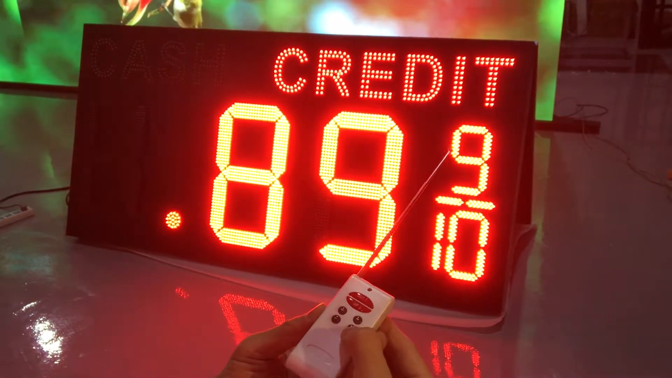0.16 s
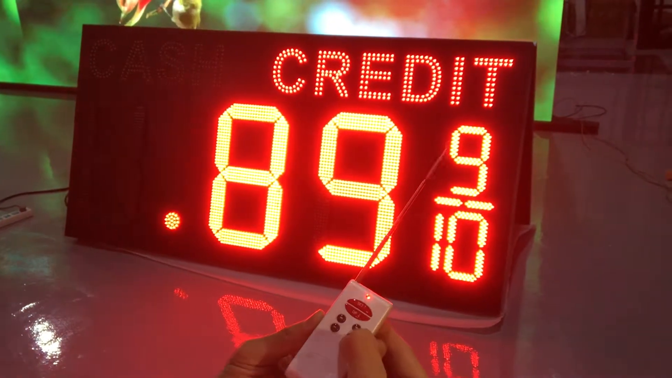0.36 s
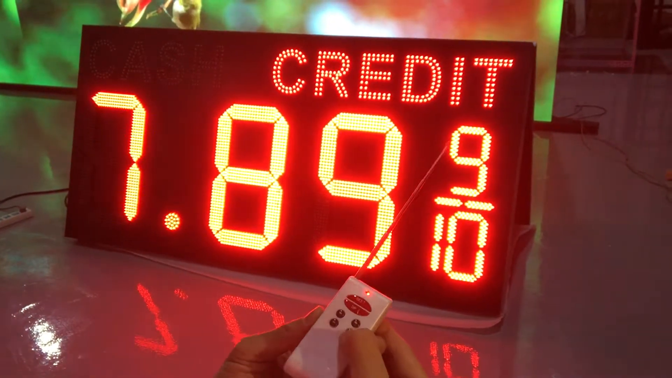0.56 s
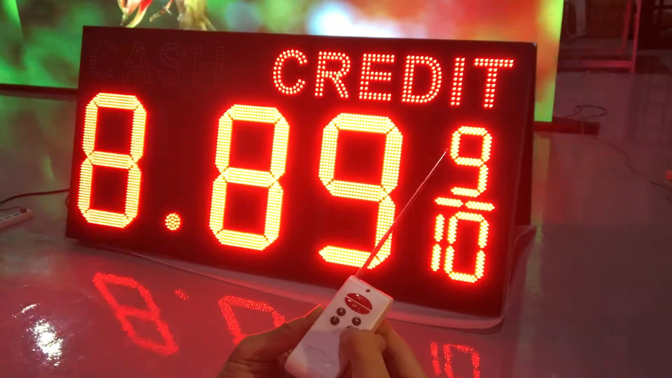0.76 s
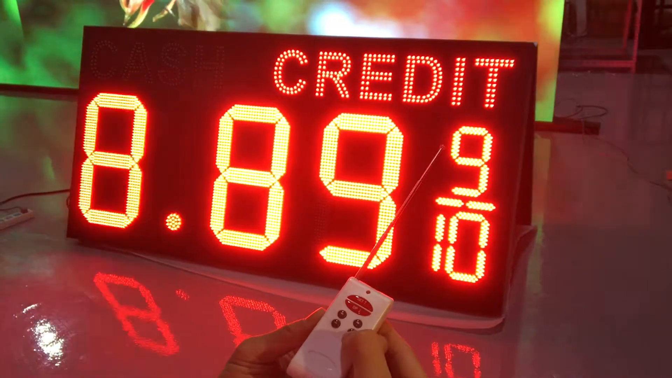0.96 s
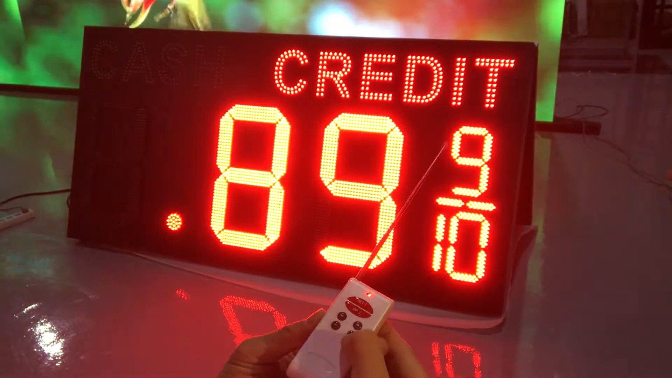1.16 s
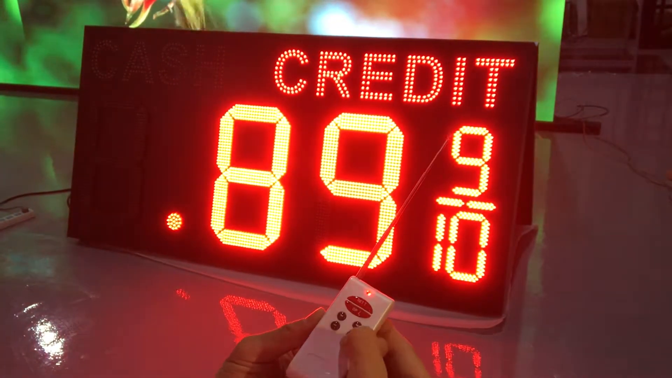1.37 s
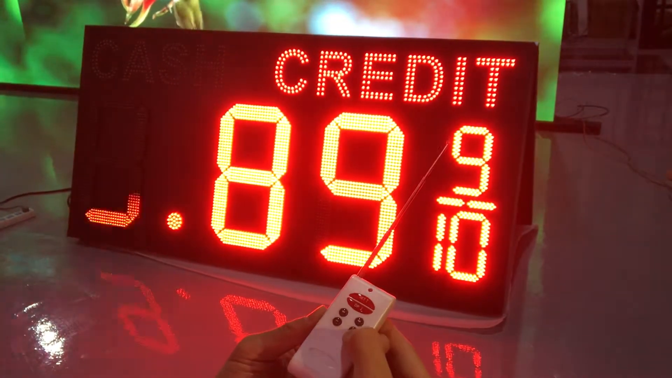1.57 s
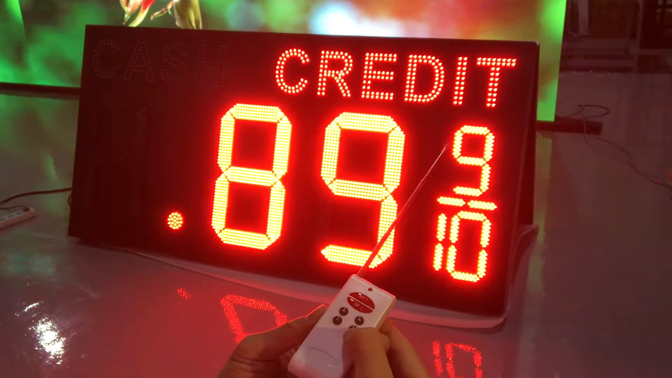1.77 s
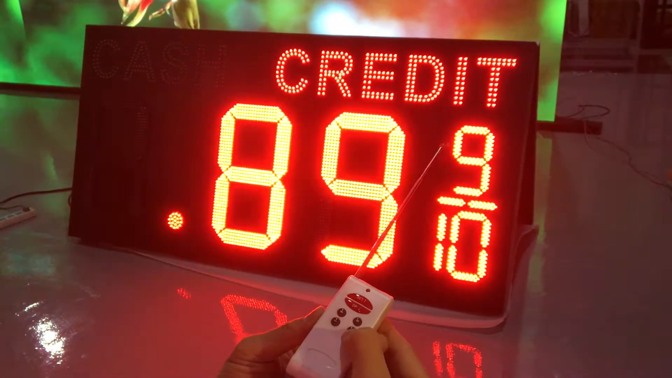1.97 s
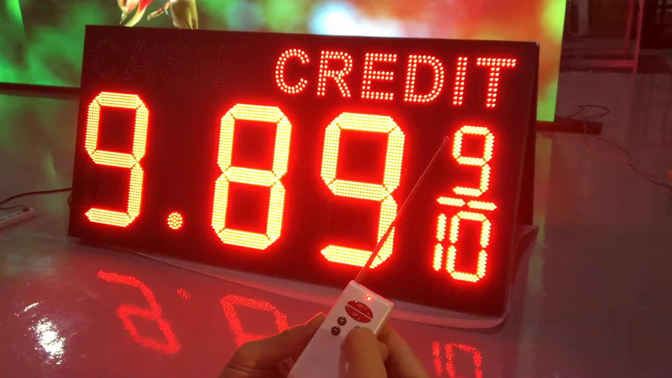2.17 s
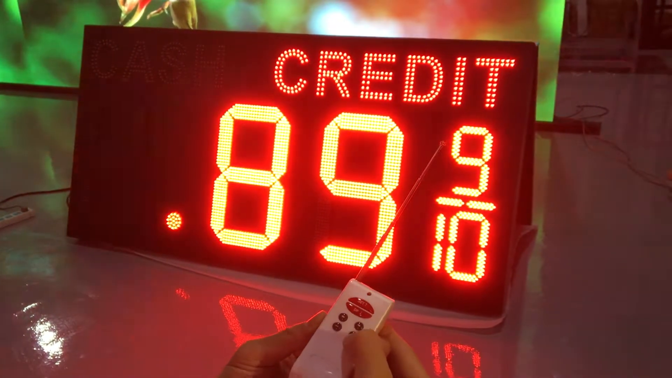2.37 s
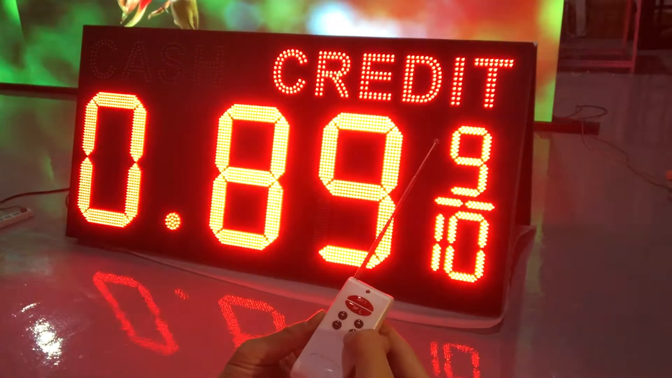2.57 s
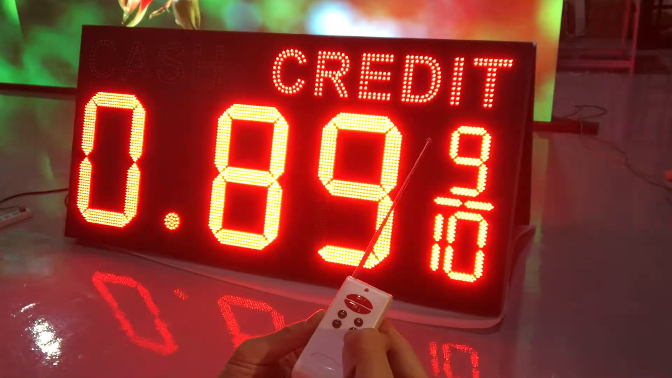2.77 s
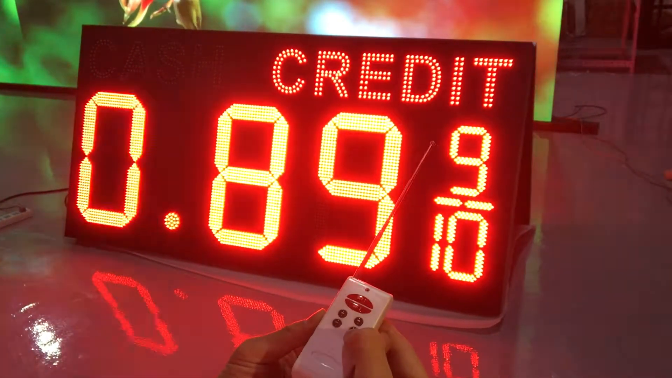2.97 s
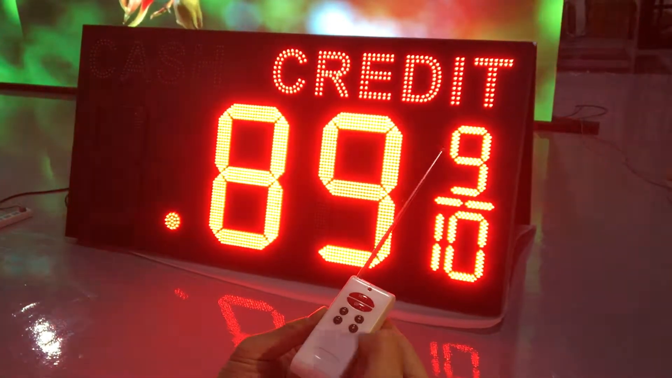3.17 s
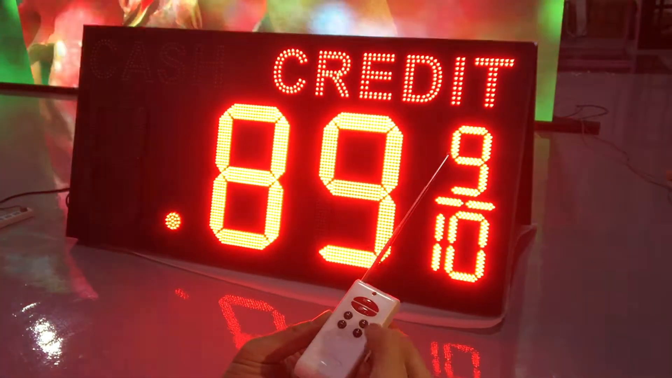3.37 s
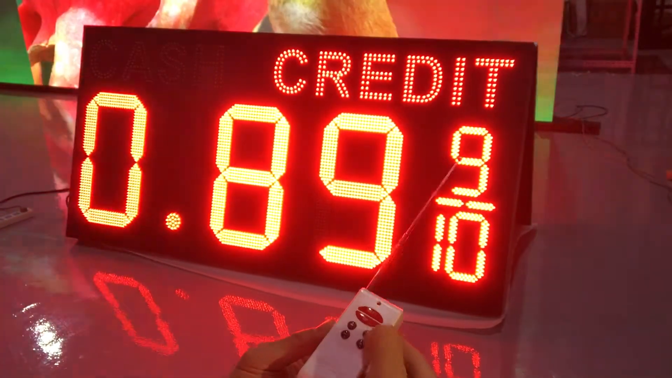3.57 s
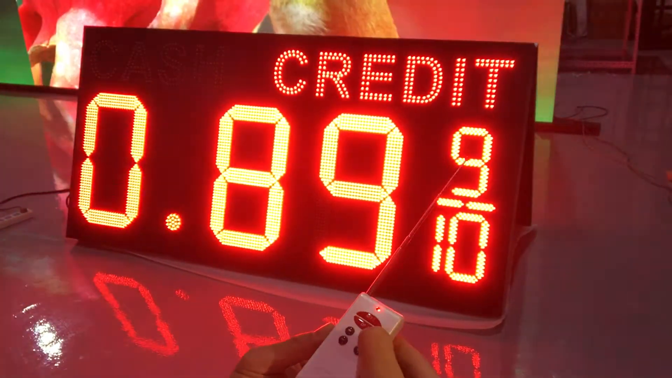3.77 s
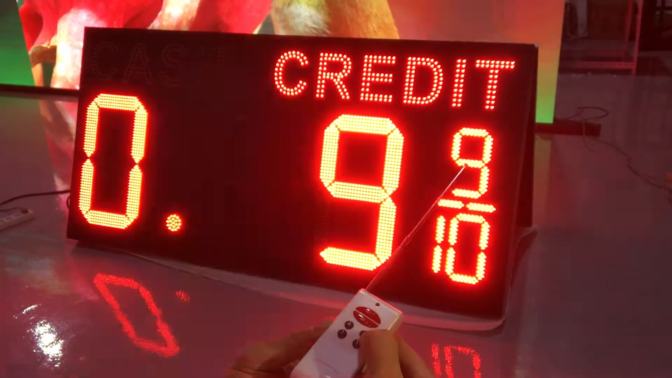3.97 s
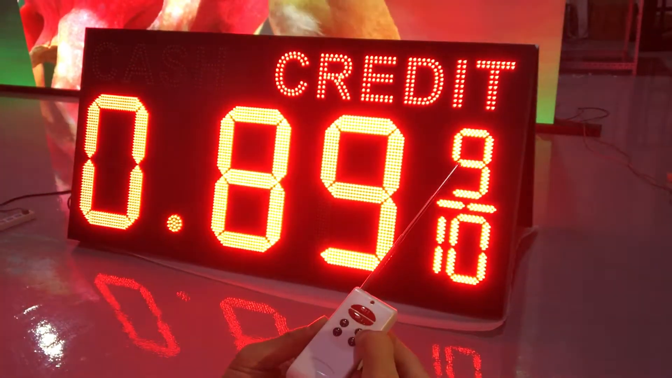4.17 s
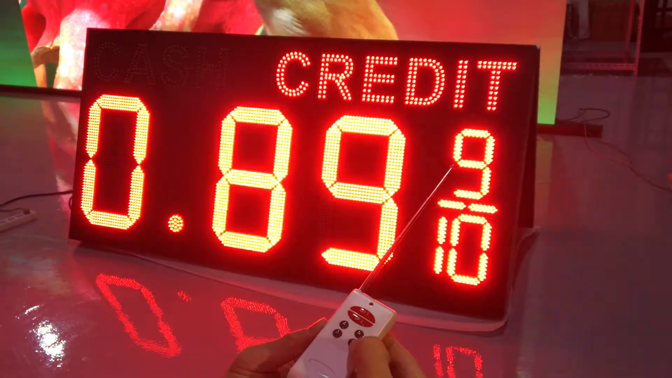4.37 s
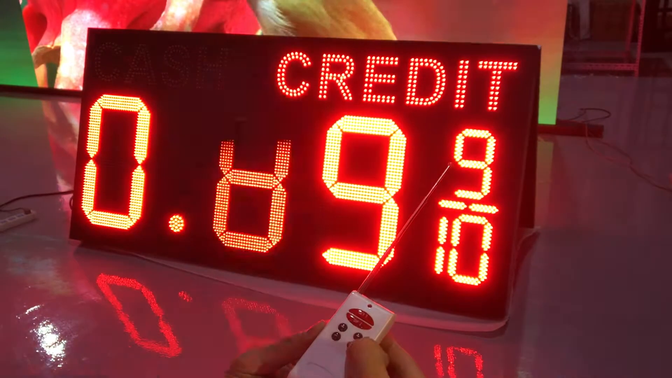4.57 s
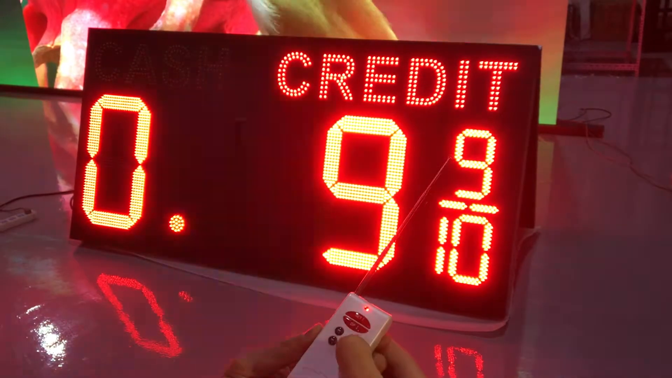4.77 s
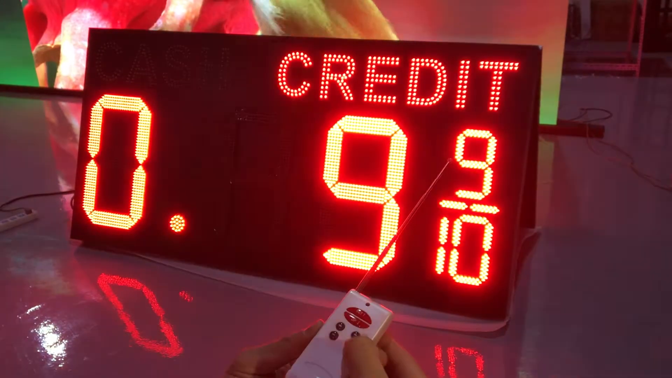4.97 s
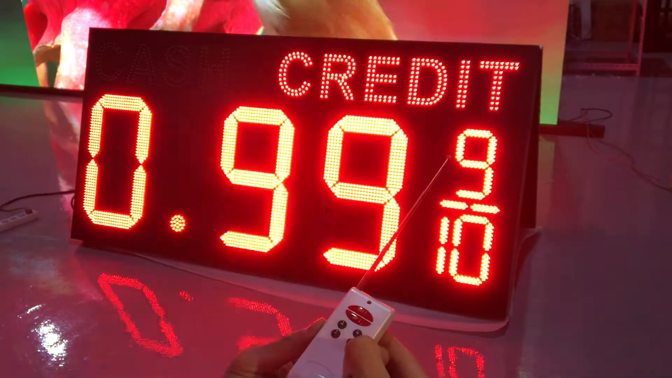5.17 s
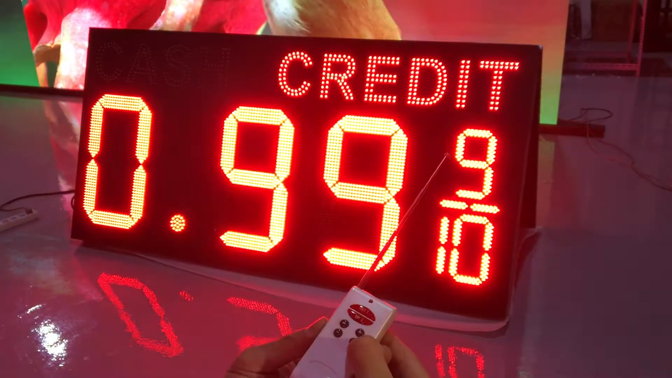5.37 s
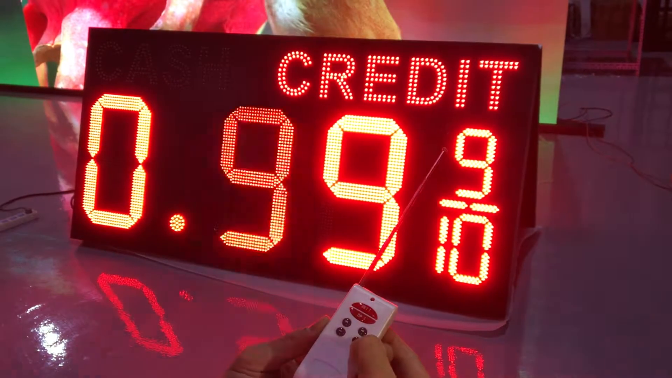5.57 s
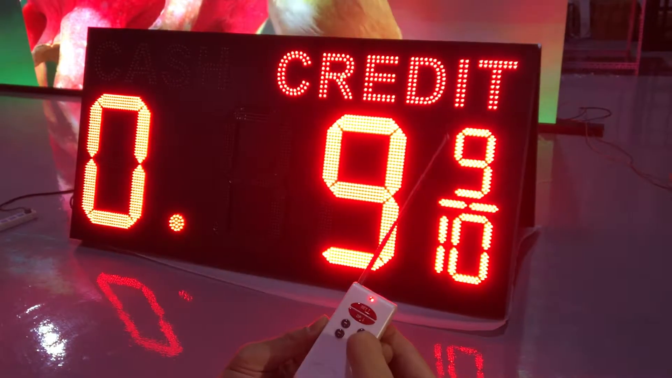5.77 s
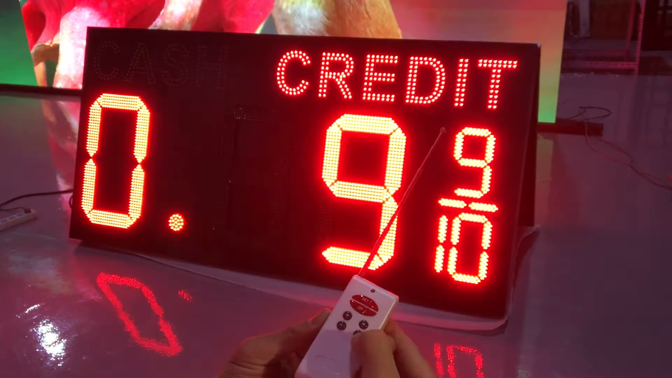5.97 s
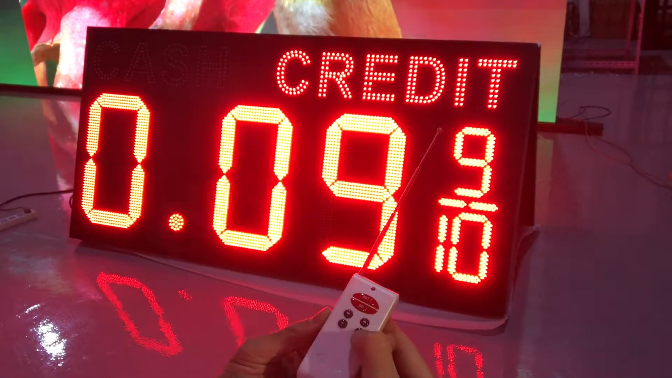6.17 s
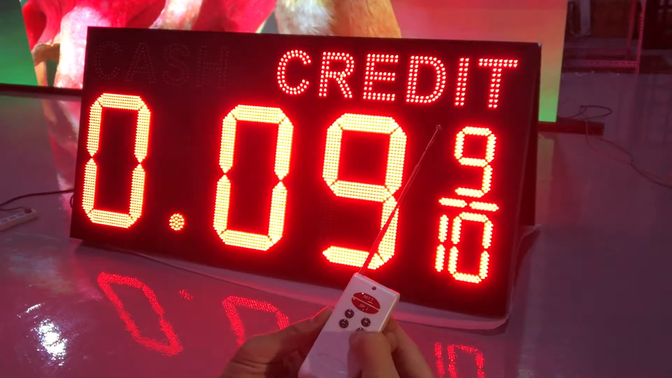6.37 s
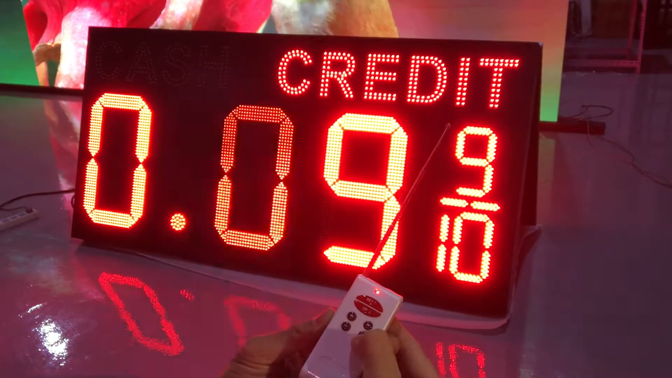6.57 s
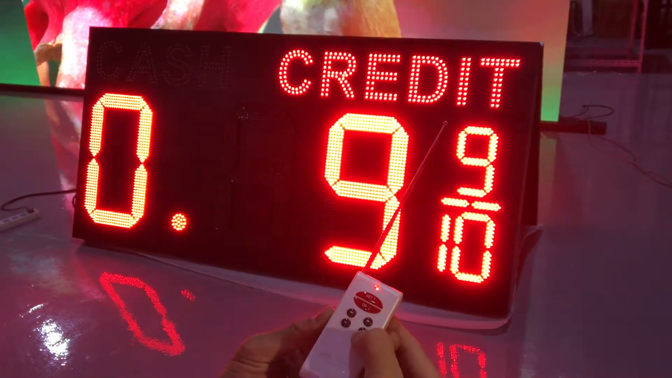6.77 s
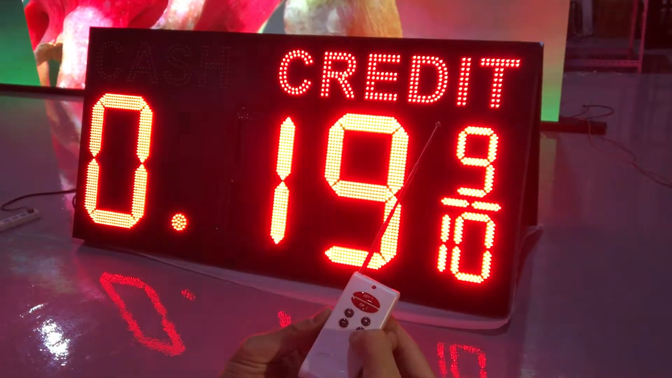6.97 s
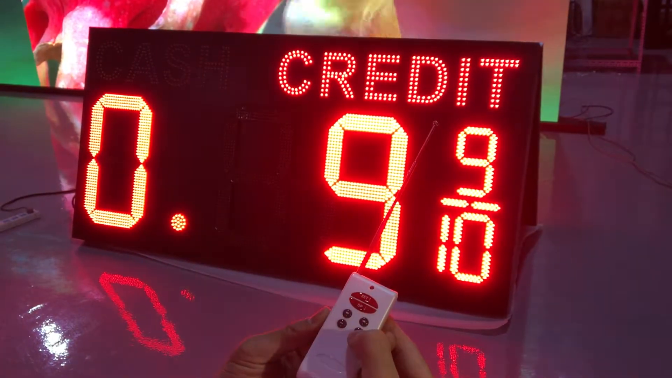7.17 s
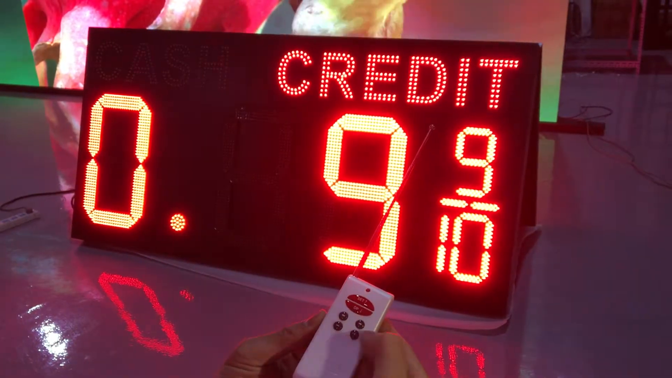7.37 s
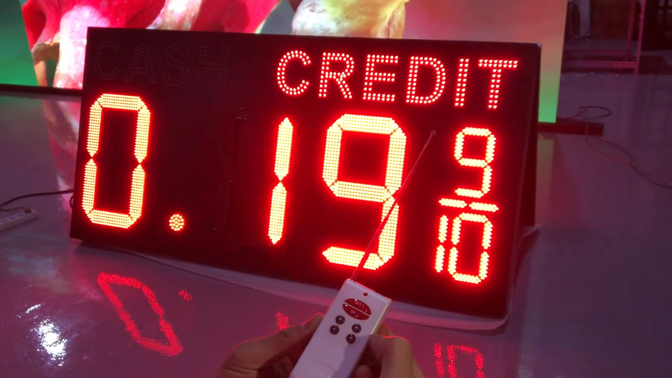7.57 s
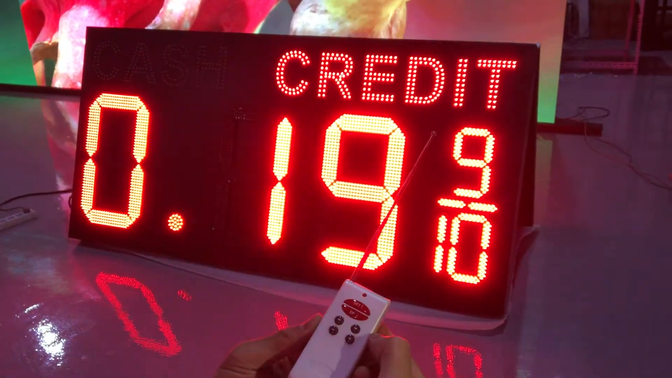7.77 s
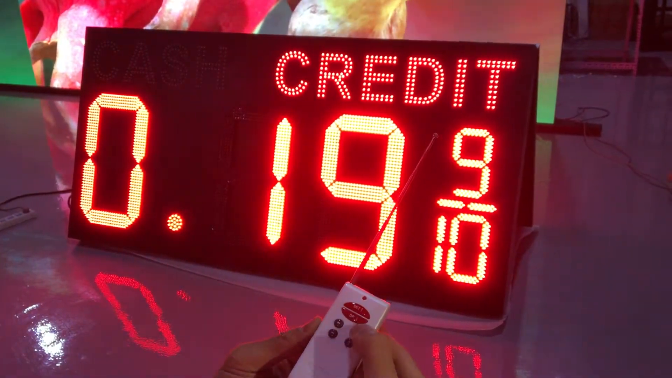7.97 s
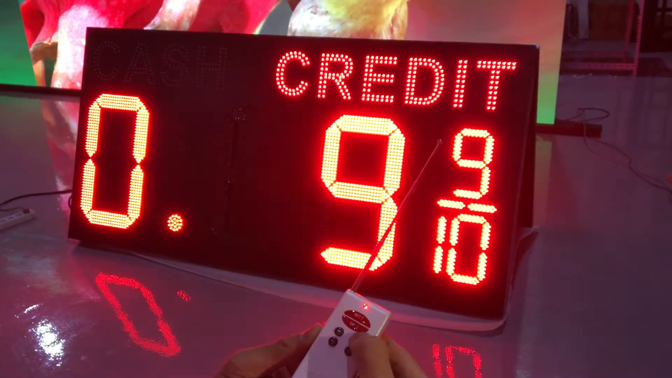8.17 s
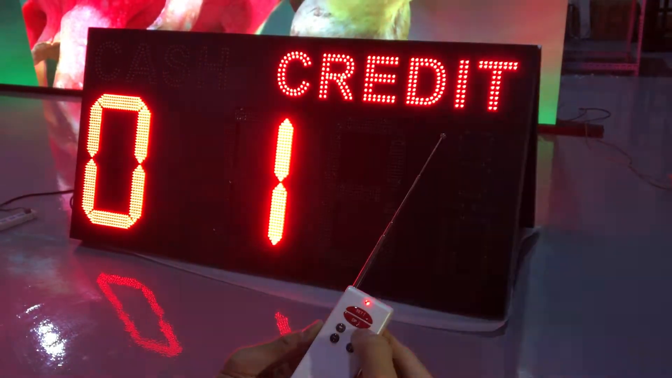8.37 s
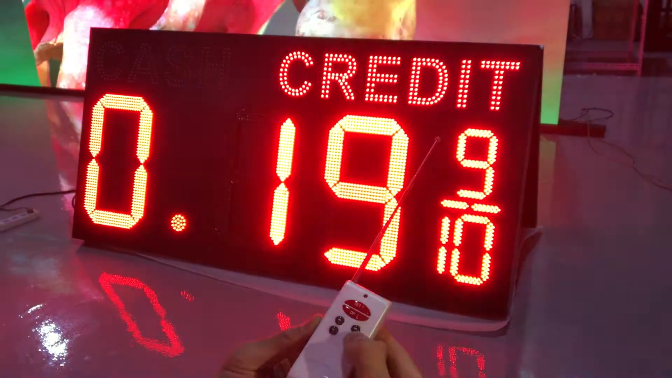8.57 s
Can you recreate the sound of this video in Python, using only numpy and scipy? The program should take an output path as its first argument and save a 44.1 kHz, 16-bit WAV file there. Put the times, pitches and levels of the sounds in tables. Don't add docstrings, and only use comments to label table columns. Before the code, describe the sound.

A small plastic remote's button clicks sharply in and out, eight slow press-and-release pairs, close up over a faint low hum in a large hall.

```python
import sys
import numpy as np
from scipy import signal
from scipy.fft import rfft, irfft
from scipy.io import wavfile
from scipy.ndimage import uniform_filter1d

SR = 44100
rng = np.random.default_rng(int(sys.argv[2]) if len(sys.argv) > 2 else 0)


def ratio(d):
    e = np.asarray(d, float) / 20
    return 10 ** e


def waveform_to_disk(signal):
    frames = np.transpose(np.atleast_2d(signal))
    scaled = np.clip(frames, -1, 1) * 32767
    samples = np.round(scaled).astype(np.int16)
    wavfile.write(sys.argv[1], SR, samples)


N = 380583

# pitch_hz, density_db (per Hz)
FAN_COLOUR = [(15, -45), (28, -8.5), (50, 3.5), (110, -2.5), (190, -6), (260, -12.5), (430, -19),
              (620, -20.5), (1000, -30), (3000, -36), (5000, -51), (8000, -47.5), (15000, -49.5)]
FAN_DB = -53
# pitch_hz, width_hz, level_db
HUMS = [(48.5, 19, -63.5), (96.1, 5.3, -61.5), (300.5, 15, -73.5), (620, 77, -72)]
WHINE = 3400, 5, -88
# time_s, level_db
MOTOR_LEVEL = [(0.0, -70), (1.6, -68), (3.0, -62.5), (4.2, -60.5), (7.9, -60.5), (8.63, -63)]
MOTOR_HZ = 248.4
# pitch_hz, density_db (per Hz)
TYRE_COLOUR = [(400, -10.5), (700, -3), (1500, -2), (3000, -13), (6000, -23), (10000, -32.5), (15500, -53)]
# closest_s, engine_rumble_db, tyre_hiss_db, half_length_s
PASSES = [
    (0.58, -79, -71, .2),
    (1.884, -57.5, -64, 0.12),
    (2.956, -57, -63, 0.22),
    (3.868, -57, -62.5, 0.14),
]
ROAD_HISS_DB, ROAD_RUMBLE_DB = -69.5, -64.5

# start_s, level_db, ring_db, rattle_db, crack_db
PRESSES = [
    (0.324, -20, 5, 6, -1),
    (1.245, -19.5, 4.5, 0, -1.5),
    (2.105, -19.5, 5, -2, 0),
    (3.717, -22.5, 2.5, 13, -1.5),
    (4.7248, -18.5, 7.5, -6, -0.5),
    (5.745, -18, 7.5, -6, -0.5),
    (6.579, -18.5, 8, 3.5, -0.5),
    (8.197, -22, 7, 15, 2),
]
# start_s, level_db, ring_db, rattle_db, crack_db
RELEASES = [
    (0.696, -21, 2, 3.5, -0.5),
    (1.641, -20.5, 3.5, -0.5, 0),
    (2.442, -19.5, 4.5, 3.5, 2),
    (4.023, -25.5, -6, 3, -5),
    (5.1057, -21, 0.5, -1, -7),
    (6.049, -20, 4, 1, -2),
    (6.89, -19.5, 4, 3.5, 1),
    (8.5, -23, 3, 7.5, 2),
]
# start_s, level_db, ring_db, rattle_db, crack_db
CREAKS = [
    (0.4823, -44.5, -12, -8, 0),
    (0.5065, -44, -6, -6, -5),
    (0.6372, -45.5, -6, -6, -10),
    (0.6455, -49, 15, 2, -3),
    (0.6578, -37, 14, 7, 7),
    (1.3176, -36.5, -12, -4, -13),
    (1.341, -51, 0, -4, -2),
    (2.162, -37.5, 0, -6, -1),
    (4.0004, -48, 6, 2, 2),
    (8.577, -46, 11, 2, 6),
]
# pitch_hz, width_hz, level_db
PRESS_MODES = [(1225, 475, 1), (1785, 380, -0.5), (2700, 750, -5.5), (3115, 270, -1), (3643, 396, 0.5),
               (4370, 280, -68), (5260, 570, -10), (6430, 410, -9), (8530, 580, -6.5), (9900, 380, -11),
               (11690, 380, -12.5), (12900, 1900, -15), (15200, 620, -33)]
# pitch_hz, width_hz, level_db
RELEASE_MODES = [(1160, 430, 0), (1780, 525, -3), (2600, 380, -1), (3070, 220, -4.5), (3560, 406, 0),
                 (4320, 200, -50), (5550, 470, -7.5), (6300, 750, -9), (8270, 410, -6.5),
                 (11370, 1100, -25)]
# pitch_hz, width_hz, level_db
CREAK_MODES = [(1190, 400, -2.5), (1950, 600, -3.5), (3580, 600, -0.5), (4800, 900, -4), (6400, 1000, -9),
               (7550, 900, -15), (9600, 1700, -13), (12000, 2000, -18.5)]
BAND_EDGES_HZ = 3300, 4100, 6000
SNAP_SIZE = 2048

# pitch_hz, t60_s, level_db
REVERB = [(1480, 0.46, -11), (2540, 0.3, -13.5), (3320, 0.79, -22.5), (5800, 0.91, -23.5),
          (7900, 0.75, -30.5), (10300, 0.62, -16), (13700, 0.28, -26)]
# delay_s, level_db
ECHOES = [(.008, -19.5), (.018, -35), (.0245, -28), (0.033, -20), (0.039, -29)]
ECHO_TOP_HZ = 4470

MIC_DIP = 10500, 600, -3
# pitch_hz, level_db
TREBLE_TOP = [(15800, 0), (15950, -20), (16600, -26), (16900, -70)]


def level(x, db):
    return x * ratio(db) / np.sqrt(np.mean(x ** 2))


def shaped(gain, size=N):
    hz = np.arange(size // 2 + 1) * SR / size
    spectrum = rfft(rng.standard_normal(size)) * gain(hz + 1e-3)
    return level(irfft(spectrum, size), 0)


def colour(points):
    hz, db = np.transpose(points)
    return lambda f: ratio(np.interp(np.log(f), np.log(hz), db))


def walk(rate_hz):
    hold = int(SR / rate_hz)
    held = np.repeat(rng.standard_normal(N // hold + 1), hold)
    return uniform_filter1d(uniform_filter1d(held, hold), hold)[:N]


def fans():
    return level(shaped(colour(FAN_COLOUR)) * ratio(0.53 * walk(2.9)), FAN_DB)


def power_supplies():
    out = np.zeros(N)
    for hz, width, db in [*HUMS, WHINE]:
        out += ratio(db) * shaped(lambda f: 1 / (1 + (2 * (f - hz) / width) ** 2))
    return out


def motor():
    load_db = np.interp(np.arange(N) / SR, *np.transpose(MOTOR_LEVEL))
    gain = np.sqrt(2) * ratio(load_db + 1.26 * walk(5))
    speed_hz = MOTOR_HZ + 0.788 * walk(3.014)
    return gain * np.sin(2 * np.pi * np.cumsum(speed_hz) / SR)


def passing():
    closest_s, rumble_db, hiss_db, half_s = np.transpose(PASSES)[:, :, None]
    near = 1 / (1 + ((np.arange(N) / SR - closest_s) / half_s) ** 2)
    return [np.sqrt(ratio(road_db) ** 2 + np.sum(ratio(db) ** 2 * near, axis=0))
            for road_db, db in ((ROAD_RUMBLE_DB, rumble_db), (ROAD_HISS_DB, hiss_db))]


def traffic():
    engines, tyres = passing()
    hiss = shaped(colour(TYRE_COLOUR)) * tyres * ratio(0.45 * walk(3.2))
    rumble = shaped(lambda f: np.exp(-(np.log2(f / 250) / 0.87) ** 2))
    return hiss + rumble * engines * ratio(1.2 * walk(4))


def snaps(events, modes, sign, push_db, contact_s, landing_db, chatter_db, scrape_s, thud_db,
          scatter_db=1.2, detune=.008):
    out = np.zeros((2, N + SNAP_SIZE))
    t = np.arange(SNAP_SIZE) / SR
    f = np.arange(SNAP_SIZE // 2 + 1) * SR / SNAP_SIZE
    hz, width, mode_db = np.transpose(modes)[:, :, None]
    facing = (-1.) ** np.arange(len(modes))[:, None]
    chance = rng.standard_normal((len(events), 2, len(modes), 1))
    grit = rng.standard_normal((len(events), 2, SNAP_SIZE))
    turns = 2 * np.pi * f * contact_s
    jolt = ratio(push_db) * turns ** 2 * np.exp(-.5 * turns ** 2 - 4j * turns)
    strikes = 1 + ratio(landing_db) * np.exp(-2j * np.pi * f * 0.000558)
    chatter_shape = np.exp(-t / .0007) * (1 - np.exp(-t / .0003))
    for event, (size, pitch), (scrape_grit, chatter_grit) in zip(events, chance, grit):
        start_s, db, ring_db, rattle_db, crack_db = event
        parts_db = np.array([thud_db, ring_db, rattle_db, crack_db])
        part_db = parts_db[np.searchsorted(BAND_EDGES_HZ, hz)]
        centre = hz * (1 + detune * pitch)
        mode = (1j * f * width / (centre ** 2 - f ** 2 + 1j * f * width)) ** 2
        mode_gain = facing * ratio(mode_db + part_db + scatter_db * size)
        body = np.sum(mode_gain * mode, axis=0) - jolt
        run = scrape_grit * np.exp(-t / scrape_s) if scrape_s else np.ones(1)
        ringing = irfft(body * strikes * rfft(run, SNAP_SIZE))
        case = 3.5 * ringing / np.sqrt(np.sum(ringing ** 2))
        crack = np.diff(chatter_grit, 2, prepend=[0, 0]) * chatter_shape
        crack = ratio(chatter_db + crack_db) * crack
        tick = np.diff(t == 0., 2, prepend=[0, 0]) * np.sqrt(np.sum(crack ** 2) / 12)
        blurred = case * np.exp(-t / .0004) + tick
        at = int((start_s + .0003) * SR)
        out[:, at:at + SNAP_SIZE] += sign * ratio(db) * np.array([case + crack, blurred])
    return out[:, :N]


def presses():
    return snaps(PRESSES, PRESS_MODES, sign=0.77, push_db=-12.0, contact_s=.00004,
                 landing_db=-33.0, chatter_db=-11.5, scrape_s=0, thud_db=0.5)


def creaks():
    return snaps(CREAKS, CREAK_MODES, sign=0.9, push_db=-14, contact_s=.00003,
                 landing_db=-23, chatter_db=-26, scrape_s=0.0012, thud_db=6.5)


def releases():
    return snaps(RELEASES, RELEASE_MODES, sign=-0.92, push_db=-10.5, contact_s=.00005,
                 landing_db=-7.5, chatter_db=-22.0, scrape_s=0, thud_db=-0.4)


def walls(x):
    t = np.arange(SR // 2) / SR
    answer = np.zeros(len(t))
    for hz, t60, db in REVERB:
        band = shaped(lambda f: np.exp(-(np.log2(f / hz) / .4) ** 2), size=len(t))
        tail = band * ratio(-60 * t / t60) * (1 - np.exp(-t / 0.013))
        answer += level(tail, db) / np.sqrt(len(t))
    for delay, db in ECHOES:
        scattered = rng.standard_normal(len(t)) * np.exp(-np.abs(t - delay) / .0012)
        scattered = signal.lfilter(*signal.butter(1, ECHO_TOP_HZ, fs=SR), scattered)
        answer += level(scattered, db) / np.sqrt(len(t))
    return signal.fftconvolve(x, answer)[:N]


def scene():
    drone = fans() + power_supplies() + motor() + traffic()
    near, all_round = presses() + creaks() + releases()
    return (near + walls(all_round) + drone)[None]


def band_limit(x):
    return signal.sosfilt(signal.butter(12, 16850, fs=SR, output="sos"), x)


def record(dry):
    hz, width, db = MIC_DIP
    f = np.arange(N // 2 + 1) * SR / N
    port_db = db * np.exp(-((f - hz) / width) ** 2) + np.interp(f, *np.transpose(TREBLE_TOP))
    heard = irfft(rfft(dry) * ratio(port_db), N)
    return band_limit(heard)


dry = scene()
out = record(dry)
waveform_to_disk(out)
```